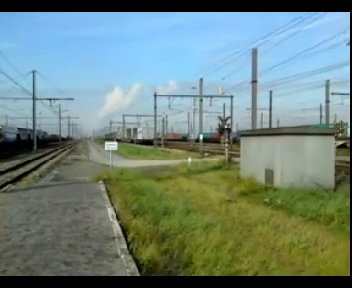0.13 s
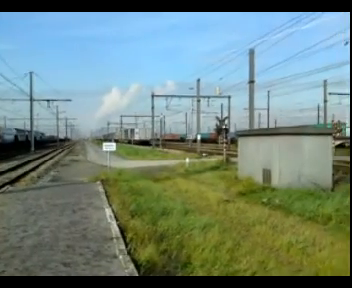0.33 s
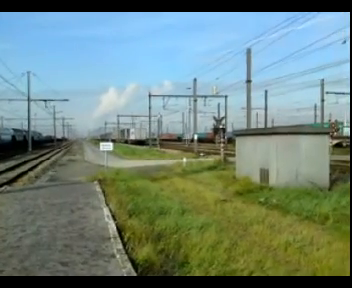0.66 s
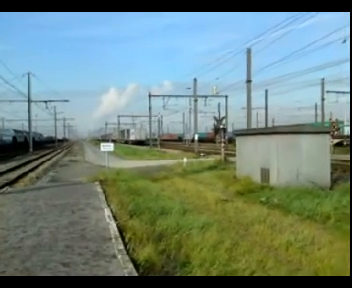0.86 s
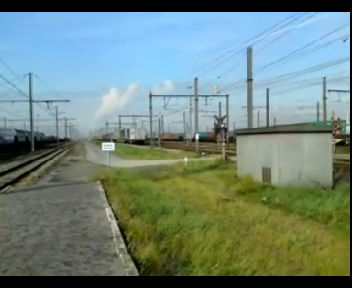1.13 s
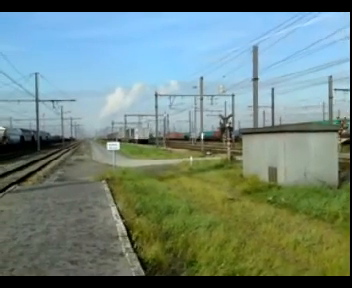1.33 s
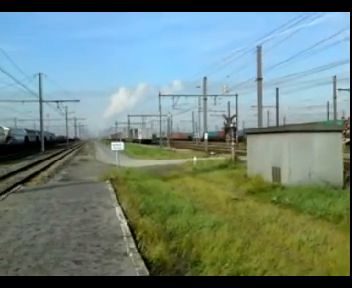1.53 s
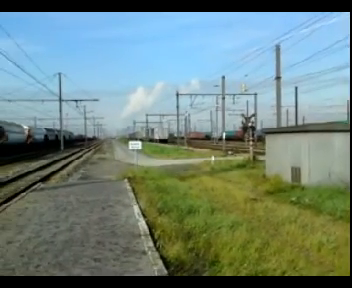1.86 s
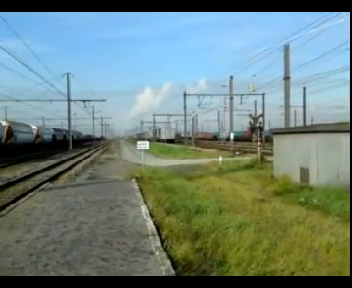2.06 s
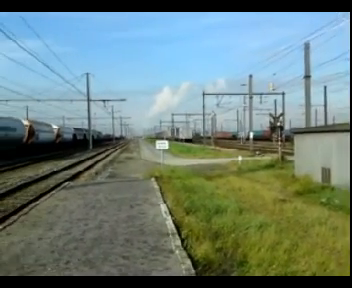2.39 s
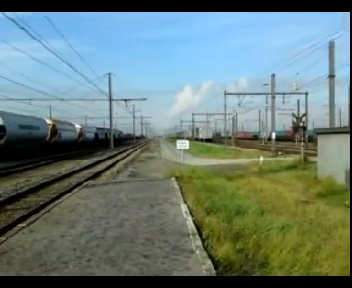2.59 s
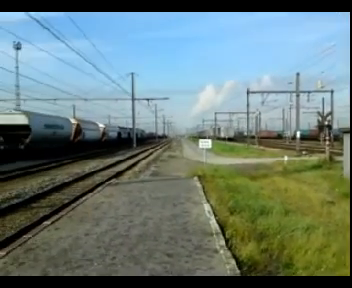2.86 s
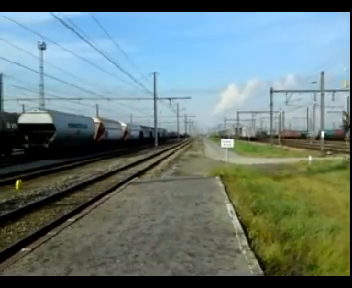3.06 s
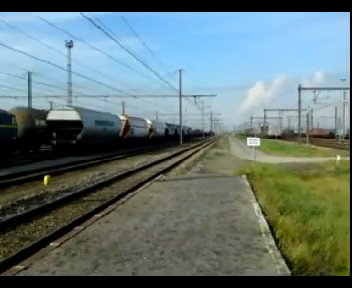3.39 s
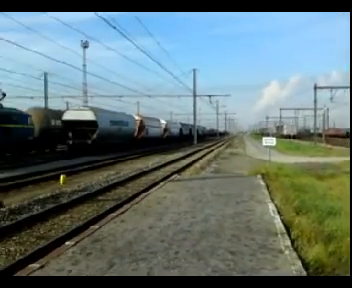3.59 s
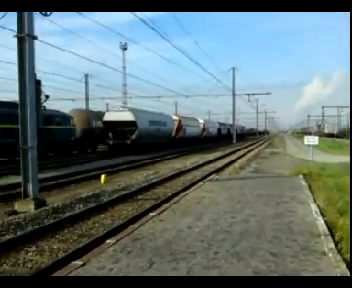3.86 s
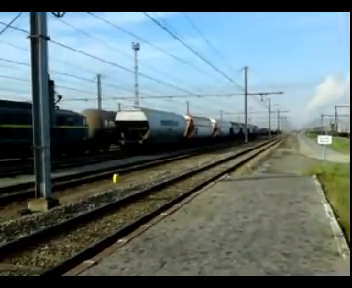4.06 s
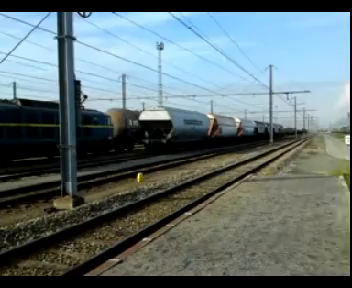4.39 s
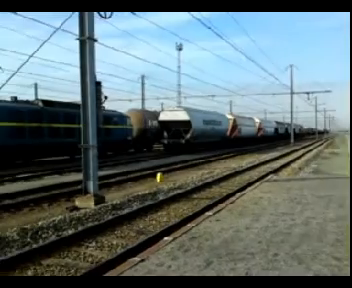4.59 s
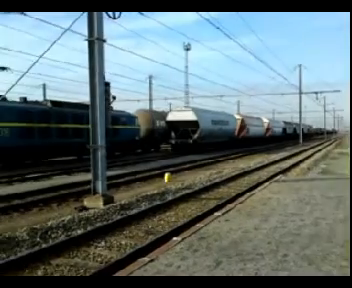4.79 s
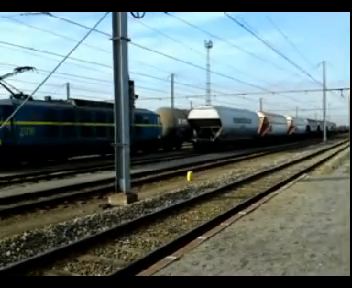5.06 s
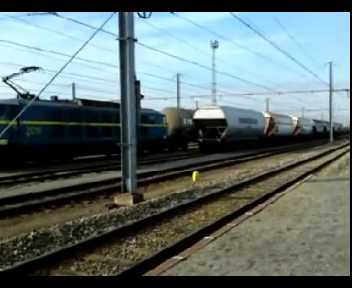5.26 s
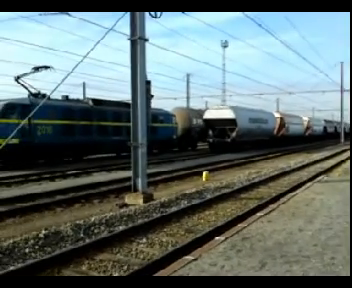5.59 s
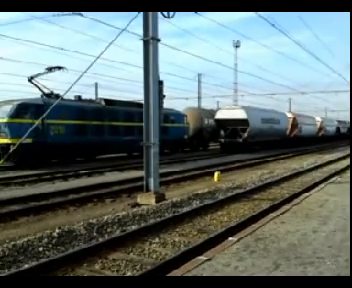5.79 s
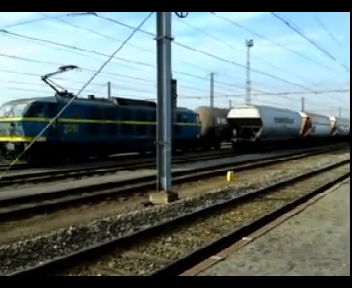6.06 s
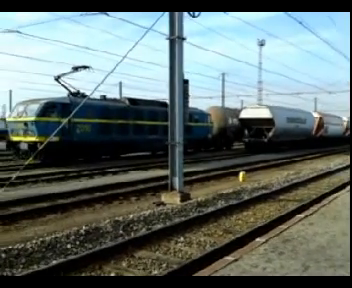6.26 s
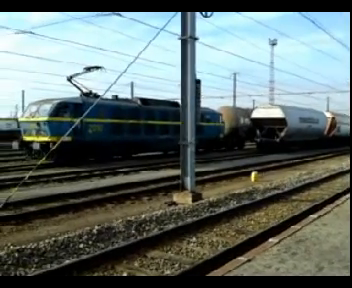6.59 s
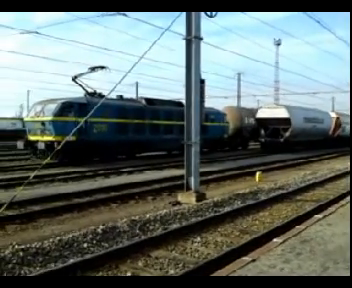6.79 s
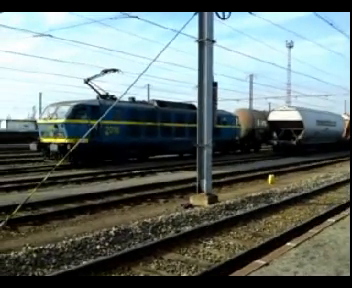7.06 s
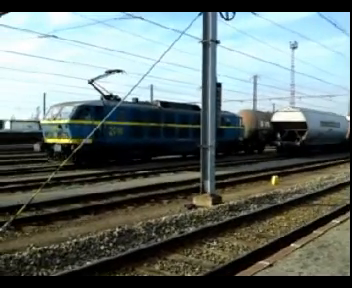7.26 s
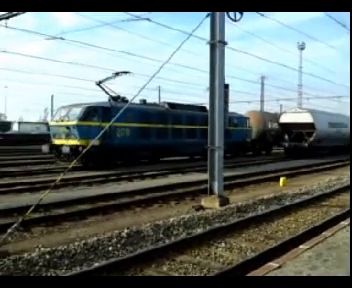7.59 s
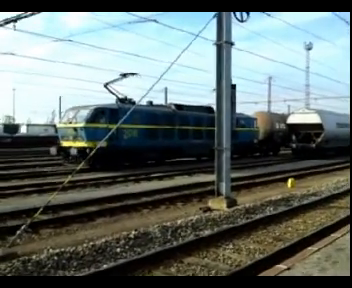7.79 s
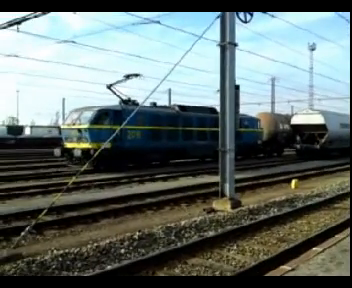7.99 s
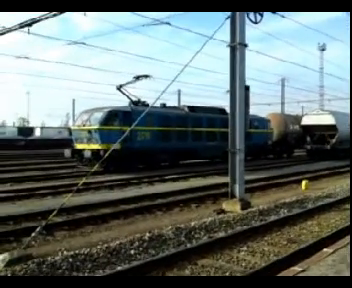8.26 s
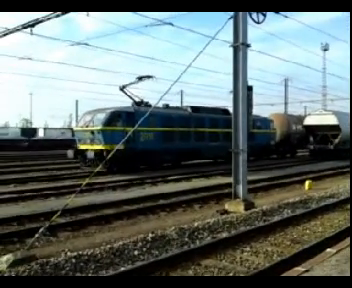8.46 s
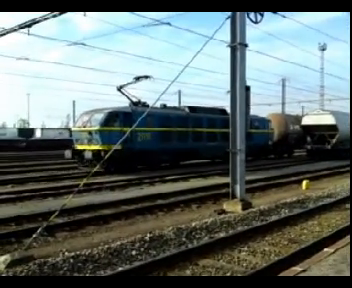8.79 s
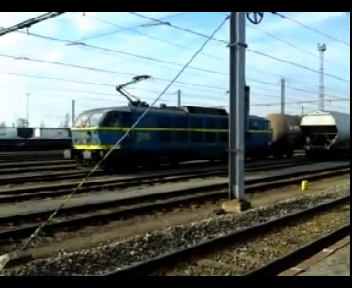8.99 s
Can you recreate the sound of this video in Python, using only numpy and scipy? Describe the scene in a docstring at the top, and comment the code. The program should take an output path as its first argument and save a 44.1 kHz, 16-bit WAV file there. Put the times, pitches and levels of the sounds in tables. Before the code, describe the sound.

An open rail yard, heard in stereo from beside the track, dry and without noticeable echo. From 0 seconds a slow freight train is already passing: deep, soft wagon rumble, a steady mid-range roar of wheels on rails, and a faint, even electric blower hum. Over it, loud wheel squeal dominates, a cluster of shrill, clashing metal tones from about 2.5 to 10 kHz, swelling unevenly a few times a second and roughened by a very fast stutter and sizzling hiss. The highest parts sit toward the right. Lower moaning tones come in short spells between 0.4 and 2.7 seconds and faintly near 5. Another shrill pitch catches around 1.7. The top squeal surges around 4.3, thins near 6, and strengthens around 7. A small metal knock falls at 7.4. Around 8 the squeal lets go and fades rapidly; a click and knock at 8.7 punctuate the remaining rumble, roar and hum until about 9.

```python
"""In an open rail yard, a freight train rolls slowly through a curve.
Its wheels slip sideways on the rails and squeal: tones at the pitches of the wheel discs swell until
the wheels run free after about eight seconds; a fast stutter lies over them, and a hiss goes along.
Underneath, shaped noise makes the wagons' rumble and the rails' roar, and steady tones make the hum
of the electric locomotive's blowers. A deep moan and a few metal knocks come and go."""
import sys
import numpy as np
from scipy import signal
from scipy.fft import rfft, irfft, next_fast_len
from scipy.io import wavfile
from scipy.ndimage import uniform_filter1d

SR = 44100
rng = np.random.default_rng(int(sys.argv[2]) if len(sys.argv) > 2 else 0)


def materialize(psi):
    """Save the field psi as 16-bit PCM at rate SR to the path in sys.argv[1].

    A 1-D psi becomes a single channel; in a 2-D psi each row is a channel.
    """
    bounded = np.clip(np.atleast_2d(psi).T, -1, 1)
    quanta = np.round(bounded * 32767).astype(np.int16)
    wavfile.write(sys.argv[1], SR, quanta)


N = 403062
STEP = 30  # samples between two points of a slow control signal
TIME = np.arange(N) / SR
SLOW = np.arange(N // STEP + 2) * STEP / SR


def undb(db):
    """Turn decibels into a gain."""
    return 10 ** (np.asarray(db) / 20)


def unit(x):
    """Scale to rms 1."""
    return x / np.sqrt(np.mean(np.abs(x) ** 2))


def curves(table):
    """Draw each column of a table as a slow control signal, with straight lines between its points."""
    t, *columns = np.transpose(table)
    return [np.interp(SLOW, t, column) for column in columns]


def fast(control):
    return np.interp(TIME, SLOW, control)


def ramp(start_s, length_s):
    """Rise from 0 to 1 and stay there."""
    return np.clip((SLOW - start_s) / length_s, 0, 1)


def sides(pan_db):
    """Left and right gains for a left-minus-right level, with mean power 1."""
    gains = undb(np.array([pan_db, -pan_db]).reshape(2, -1) / 2)
    return gains / np.sqrt(np.mean(gains ** 2, axis=0))


def wander(width_hz):
    """Random size and phase of a resonance: the wider it is, the faster they change; rms 1."""
    count = len(SLOW)
    pole = np.exp(-np.pi * width_hz * STEP / SR)
    push = rng.standard_normal(2 * count) + 1j * rng.standard_normal(2 * count)
    ringing = signal.lfilter([1], np.poly([pole, pole]), push)
    return unit(ringing[count:])  # the first half only settles the filter


def sustained(width_hz, likeness):
    """Several sources beat on one mode, partly alike left and right; their joint power is evened out."""
    hold_s = .055
    shared = wander(width_hz)
    separate = np.array([wander(width_hz), wander(width_hz)])
    beating = np.sqrt(likeness) * shared + np.sqrt(1 - likeness) * separate
    power = uniform_filter1d(np.abs(beating) ** 2, int(hold_s * SR / STEP))
    return beating / np.sqrt(power)


def stutter(depth, sag=0.64, uneven=0.31):
    """Stutter fifty times a second: each beat starts afresh in phase and size, then sags; rms 1."""
    beat, age = np.divmod(SLOW * 50, 1)
    beat = beat.astype(int)
    turn, size = rng.standard_normal((2, beat[-1] + 1))[:, beat]
    steps = np.exp(depth * (1j * turn + uneven * size - sag * age))
    rounded = uniform_filter1d(uniform_filter1d(steps, size=4), size=2)
    return unit(rounded)


def tone(hz, width_hz, db, pan_db, depth, likeness, lead):
    """One mode in stereo; the phase (lead in rad) between the sides sways slowly at random."""
    lead = lead + .45 * wander(1.9).real
    turned = np.exp(.5j * np.array([lead, -lead]))
    mode = sustained(width_hz, np.clip(likeness, 0, 1)) * stutter(depth) * turned
    carrier = np.exp(2j * np.pi * hz * TIME)
    controls = mode * sides(pan_db) * undb(db)
    return np.array([np.sqrt(2) * (fast(control) * carrier).real for control in controls])


# How alike the noise is on both sides: (f/Hz, likeness 0-1)
NOISE_LIKENESS = [(25, 0.7), (110, 0.76), (550, 0.86), (1200, 0.89), (2300, 0), (4000, 0.05)]


def by_pitch(table, hz):
    """Read a table at these frequencies, evenly along a musical (logarithmic) scale."""
    table_hz, values = np.transpose(table)
    return np.interp(np.log(hz + 1), np.log(table_hz), values)


def noise(spectrum, pan, lead_s=0):
    """Random noise shaped by frequency, most alike left and right below 2 kHz; rms 1 in the middle."""
    size = next_fast_len(N)
    hz = np.arange(size // 2 + 1) * SR / size
    alike = np.clip(by_pitch(NOISE_LIKENESS, hz), -1, 1)
    mid, side = rfft(rng.standard_normal((2, size))) * np.sqrt([1 + alike, 1 - alike])
    late = np.exp(-2j * np.pi * hz * lead_s)  # delays the right side
    pair = np.array([mid + side, (mid - side) * late])
    shaped = pair * sides(by_pitch(pan, hz)) * undb(by_pitch(spectrum, hz))
    out = irfft(shaped, size)[:, :N]
    return out / np.std(out.mean(axis=0))


# Where rumble and roar are heard: (f/Hz, left minus right/dB)
ROLLING_PAN = [(25, -3), (110, -0.5), (350, 1.5), (800, 2.5), (1900, -1.5), (3600, 4), (6500, -1),
               (11000, -25)]
ROLLING_LEAD_S = .00012  # the rolling noise arrives first on the left
# Colour of the wagon rumble: (f/Hz, relative level per Hz/dB)
RUMBLE_SPECTRUM = [(10, -14), (25, -7), (38, -6), (62, -.5), (82, 0), (115, -1), (190, -6.5), (280, -13.5),
                   (450, -26), (1000, -50)]
# Rise and fall of the rumble, before the extra RUMBLE_GAIN_DB: (t/s, level/dB)
RUMBLE_LEVEL = [(0.0, -36.5), (0.38, -33), (1.99, -35.5), (3.51, -34.5), (4.56, -37.5), (4.96, -33.5),
                (6.67, -35.5), (9.14, -36.5)]
RUMBLE_GAIN_DB = 0.54


def rumble():
    """Wagon bodies rumble: deep noise with a slowly changing level."""
    level_db = curves(RUMBLE_LEVEL)[0] + RUMBLE_GAIN_DB
    return noise(RUMBLE_SPECTRUM, ROLLING_PAN, ROLLING_LEAD_S) * fast(undb(level_db))


# Colour of the rolling roar: (f/Hz, relative level per Hz/dB)
ROAR_SPECTRUM = [(150, -21.5), (310, -7.5), (400, -8.5), (490, -2), (600, -1), (780, -9), (950, -5),
                 (1200, -8), (1480, -3.5), (1720, -7.5), (2050, -3.5), (2700, -8.5), (3700, -11.5),
                 (4400, -14.5), (5500, -22.5), (7500, -26.5), (9700, -25.5), (11000, -61)]
ROAR_DB = -35.5


def roar():
    """Wheels roar on the rails: broad noise whose level wavers slightly."""
    waver_db = .6 * wander(3).real
    return noise(ROAR_SPECTRUM, ROLLING_PAN, ROLLING_LEAD_S) * fast(undb(ROAR_DB + waver_db))


# Tones of the blowers: (f/Hz, width/Hz, level/dB)
BLOWER_TONES = [(463, 1.2, -49.5), (538, 1.2, -49), (444, 2, -52), (926, 4, -58), (1338, 14, -58),
                (1862, 14, -58)]


def blower_hum():
    """The locomotive's blowers hum on a few nearly steady tones."""
    out = 0
    for hz, width, db in BLOWER_TONES:
        out += tone(hz, width, db, pan_db=3, depth=.05, likeness=.9, lead=.3)
    return out


# Small knocks from the wagons: (t/s, f/Hz, width/Hz, level/dB, decay/s)
METAL_KNOCKS = [(7.407, 2300, 900, -28, 0.011), (8.682, 9670, 1100, -27, 0.0018),
                (8.684, 2200, 900, -33, .015)]


def knocks():
    """Loose metal gives short rings that start at once and die away quickly."""
    out = 0
    for t, hz, width, db, decay_s in METAL_KNOCKS:
        ring = (SLOW > t) * np.exp(-np.abs(SLOW - t) / decay_s)
        out += tone(hz, width, db, pan_db=-9, depth=0, likeness=0.71, lead=0) * fast(ring)
    return out


# Spells of the deep moan: (start t/s, end t/s, level/dB)
MOAN_SPELLS = [(.38, 1.266, -45), (1.4, 1.647, -39.5), (1.87, 2.188, -41), (2.42, 2.684, -43.5),
               (4.7, 5.2, -46)]


def moan():
    """A deeper wheel mode sounds in short spells with softened edges."""
    gate = 0
    for start_s, end_s, db in MOAN_SPELLS:
        gate = gate + undb(db) * ((SLOW > start_s) & (SLOW < end_s))
    softened = uniform_filter1d(gate, size=70)
    return tone(1433, 4, 0, pan_db=-4, depth=.1, likeness=.9, lead=0) * fast(softened)


def swell():
    """The squeal swells unevenly as the wheels turn, rounded at its extremes; rms 1."""
    rate_hz, width_hz = 2.7, 1.77
    sway = (wander(width_hz) * np.exp(2j * np.pi * rate_hz * SLOW)).real
    return unit(np.tanh(unit(sway)))


# How hard the wheels slip sideways; only the difference from its average counts: (t/s, level/dB)
SIDEWAYS_SLIP = [(0, -27.5), (0.7, -27), (1.5, -31.5), (2.2, -32.5), (3.05, -33), (3.55, -40), (4.3, -25.5),
                 (4.9, -34), (5.35, -36), (5.9, -41.5), (6.3, -39.5), (7.05, -30), (7.55, -29.5),
                 (7.88, -28.5), (7.97, -33.5)]
# The low part of the squeal; only the difference from its average counts: (t/s, level/dB)
LOW_SQUEAL = [(0, -28), (0.6, -27), (1.35, -23.5), (2.55, -24.5), (3.3, -22.5), (4.05, -26), (4.55, -27.5),
              (5.7, -23), (6.9, -32.5), (7.97, -27.5)]
# How each mode answers and lets go, one row per mode: (level/dB, drift/dB per s, share of slip/dB per dB,
# share of low squeal/dB per dB, swell rms/dB, runs free at t/s, level change then/dB)
MODE_RESPONSE = [(-28, -0.17, -0.08, 0.58, 2, 8.0, -16), (-28, -0.95, 0, .5, 1.65, 7.97, -6),
                 (-30.5, -0.79, 0.3, 0.5, 1.1, 8.2, -12), (-31, 0.17, 0.42, -0.32, 0.5, 8, -9.5),
                 (-26, -0.96, 0.23, 0.5, 0.64, 8.07, -7), (-34, -.08, 0.36, 0.5, 2.3, 7.96, -11),
                 (-35.5, 0.5, 0.91, 0, 1.8, 8.05, -8.5)]
# Once a mode runs free it drops quickly, then fades
RELEASE_S, FADE_DB_PER_S = .11, -24
# The last of the ringing drops further
STOP_S, STOP_FALL_S, STOP_DB = 8.5, 0.27, -13
# One mode (counted from 0) catches late and is weaker before that
LATE_MODE, CATCH_S, CATCH_RISE_S, UNCAUGHT_DB = 4, 1.7, 0.17, -11.5


def mode_levels():
    """Level of each mode in dB: it follows the slip, drifts slowly and dies when the wheels run free."""
    slip = curves(SIDEWAYS_SLIP)[0]
    slip = slip - np.mean(slip)
    low = curves(LOW_SQUEAL)[0]
    low = low - np.mean(low)
    stop = STOP_DB * ramp(STOP_S, STOP_FALL_S)
    levels = []
    for db, drift, slip_share, low_share, swell_db, free_s, drop_db in MODE_RESPONSE:
        drop = drop_db * ramp(free_s, RELEASE_S)
        fade = FADE_DB_PER_S * np.maximum(SLOW - free_s - RELEASE_S, 0)
        drive = slip_share * slip + low_share * low
        levels.append(db + drift * SLOW + drive + swell_db * swell() + drop + fade + stop)
    levels[LATE_MODE] += UNCAUGHT_DB * (1 - ramp(CATCH_S, CATCH_RISE_S))
    return levels


# Where the treble is heard: (f/Hz, left minus right/dB)
TREBLE_PAN = [(2700, -5), (3800, 7), (4500, 5), (5700, -8), (6700, -3), (7700, -11), (9600, -23),
              (11000, -2.5), (12200, -20)]
# Weaker modes that ring along, before the extra OVERTONE_DB: (f/Hz, width/Hz, level relative to top modes/dB)
WEAK_MODES = [(5060, 70, -23), (5520, 120, -26), (5948, 26, -23), (6035, 40, -24), (8185, 36, -19),
              (8495, 20, -22), (8694, 26, -23), (9560, 90, -19), (9663, 24, -15), (10207, 26, -17),
              (10530, 34, -23), (10761, 26, -11), (11289, 24, -16), (12172, 18, -32)]
OVERTONE_DB = -1


def overtones(top_db):
    """Weaker wheel modes ring along with the top of the squeal."""
    out = 0
    for hz, width, db in WEAK_MODES:
        pan_db = np.interp(hz, *np.transpose(TREBLE_PAN))
        out += tone(hz, width, top_db + OVERTONE_DB + db, pan_db, depth=.55, likeness=.6, lead=1)
    return out


# Colour of the hiss: (f/Hz, relative level per Hz/dB)
HISS_SPECTRUM = [(1800, -27), (2600, 3.5), (3200, -5.5), (3850, 5.5), (4600, -8.5), (5400, -8.5),
                 (6200, 1.5), (7000, -6.5), (8000, 0), (8600, 0.5), (9150, -3.5), (9650, 6), (10400, -4.5),
                 (10800, -26), (11400, -6), (12000, -42)]
HISS_DB = -6.5  # relative to the top modes


def squeal_hiss(top_db):
    """A hiss that stutters fifty times a second goes with the squeal, louder when the top modes are strong."""
    strength = undb(top_db + HISS_DB) * np.abs(stutter(depth=0.94))
    return noise(HISS_SPECTRUM, TREBLE_PAN) * fast(strength)


# Pitch of each squeal mode: (f/Hz)
SQUEAL_HZ = [2452, 3624, 4956, 6435, 8091, 9443, 9879]
# Character of each mode, one row per pitch: (width/Hz, stutter depth, left-right likeness 0-1, left lead/rad)
WHEEL_MODES = [(14.1, 0.35, 0.79, 1.06), (18.5, 0.44, 0.72, 2), (14.5, 0.66, 0.56, -2.5),
               (47, 0.64, 0.42, 0.5), (16, 0.91, 0.31, 2), (18.2, 0.61, 0.82, 2.16), (19, 1, 0.75, 1.04)]
# Where each mode is heard, drifting over time: (left minus right/dB, its drift/dB per s)
MODE_BEARING = [(0.4, -0.46), (6, 0.5), (5.5, -0.3), (2.5, -1.15), (-11.5, -0.23), (-9.5, 1), (-17.5, 0.55)]


def squeal():
    """Wheels slipping sideways sing on their disc modes; overtones and a hiss go along."""
    levels = mode_levels()
    out = 0
    for hz, wheel, db, bearing in zip(SQUEAL_HZ, WHEEL_MODES, levels, MODE_BEARING):
        width, depth, likeness, lead = wheel
        pan_db, pan_drift = bearing
        out += tone(hz, width, db, pan_db + pan_drift * SLOW, depth, likeness, lead)
    # overtones and hiss follow the smoothed average of the four top modes
    top_db = uniform_filter1d(np.mean(levels[-4:], axis=0), size=300)
    return out + overtones(top_db) + squeal_hiss(top_db)


def scene():
    """The whole train, from the background rumble to the squeal."""
    return rumble() + roar() + blower_hum() + knocks() + moan() + squeal()


def record(dry):
    """A steep low-pass filter removes the highest treble."""
    top_hz = 12250
    low_pass = signal.ellip(10, .2, 80, top_hz, fs=SR, output="sos")
    return signal.sosfilt(low_pass, dry)


dry = scene()
out = record(dry)
materialize(out)
```